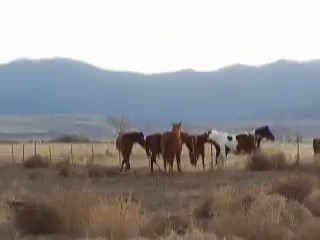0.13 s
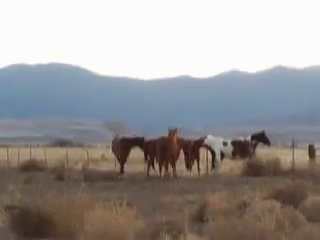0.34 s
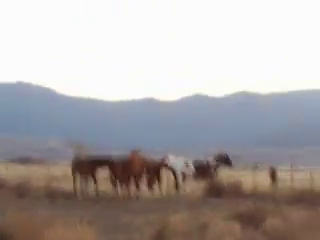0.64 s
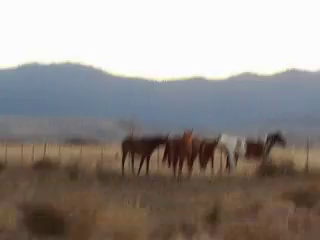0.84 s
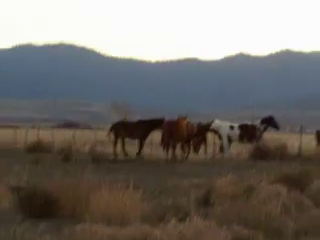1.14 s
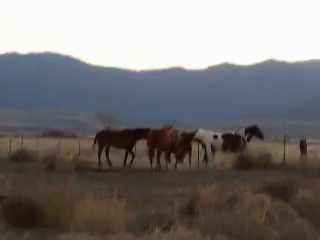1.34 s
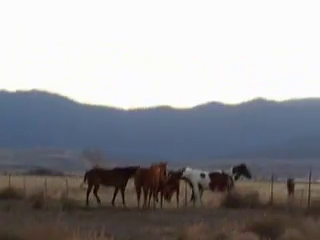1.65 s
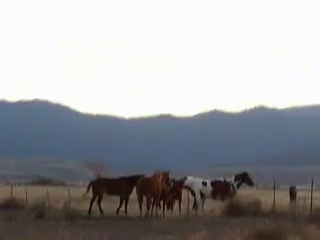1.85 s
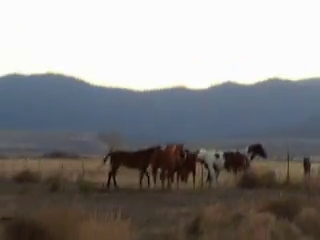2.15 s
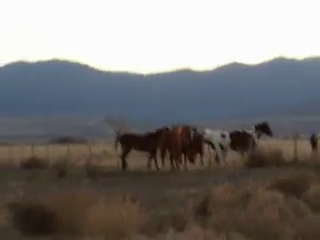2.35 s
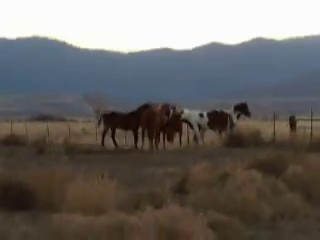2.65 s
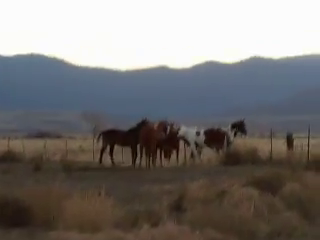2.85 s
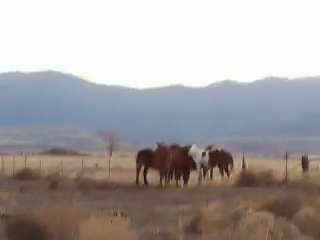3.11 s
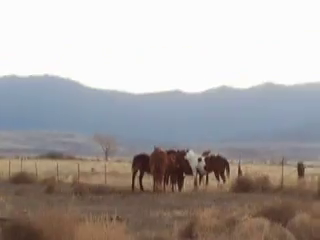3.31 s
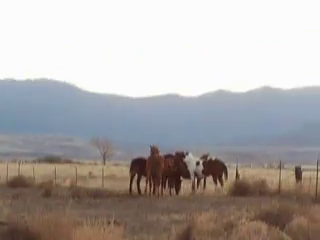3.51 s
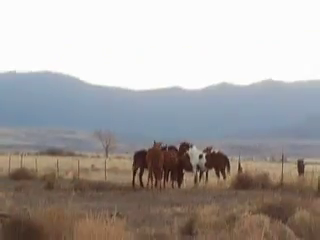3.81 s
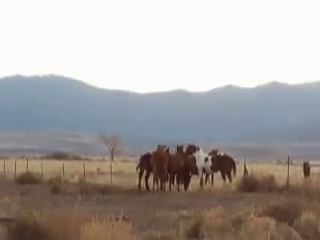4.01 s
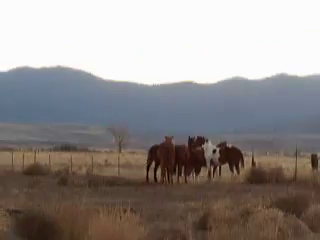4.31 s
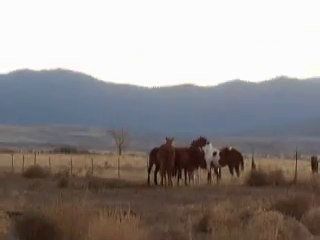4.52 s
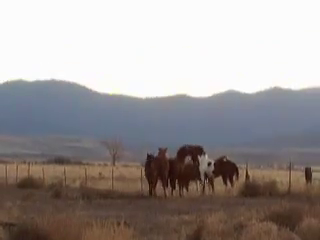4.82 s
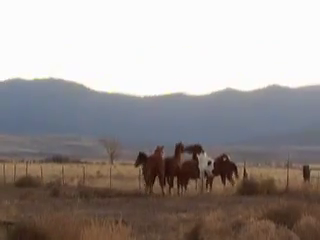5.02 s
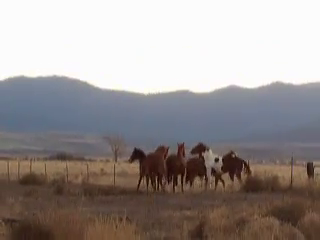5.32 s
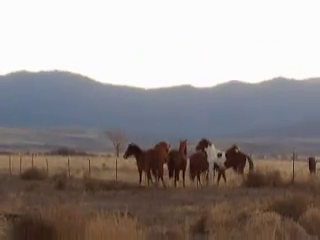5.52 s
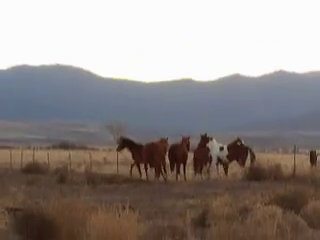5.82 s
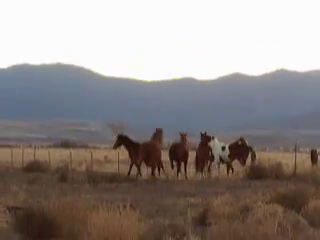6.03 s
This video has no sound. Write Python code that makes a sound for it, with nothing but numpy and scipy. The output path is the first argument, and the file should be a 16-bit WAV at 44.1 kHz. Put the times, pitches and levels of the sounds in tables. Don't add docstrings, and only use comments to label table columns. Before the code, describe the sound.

A low wind rumble and thin steady hiss open the scene, with a tiny bump near 0.26 s. From 0.3 s, fingers on the camera's plastic case make very close, loud scrapes, squeaky rubs and resonant clicks, strongest around 0.5 s, with a hard knock at 0.77 s. Rubbing weakens from about 1.1 to 1.7 s, with scattered ticks. A second dense bout runs from 1.75 to 3.15 s: gritty slides, sharp taps near 2.06 s, a strong scrape around 2.27 s and crowded rattling near 3 s, along with a gust. Then it drops to quiet wind and hiss, barely brushed at 3.5 s. At 4.45-4.9 s a distant horse squeals once: a rising, rough whistle, buzzing and raspy midway, then a second thinner push falling away into a faint field tail. Small wind puffs follow, then faint rubbing from 5.3 to 5.75 s and soft dull bumps until about 6.1 s.

```python
import sys
import numpy as np
from scipy import signal
from scipy.fft import rfft, irfft, next_fast_len
from scipy.io import wavfile

SR = 44100
rng = np.random.default_rng(int(sys.argv[2]) if len(sys.argv) > 2 else 0)


def volts_from_decibels(level):
    exponent = np.asarray(level, float) / 20
    return 10 ** exponent


def dump_mix(stems):
    frames = np.atleast_2d(stems).T
    limited = np.clip(frames, -1, 1)
    pcm = np.round(limited * 32767).astype(np.int16)
    wavfile.write(sys.argv[1], SR, pcm)


N = 271607


def evened(x):
    return x / np.sqrt(np.mean(x ** 2) + 1e-20)


def read(points, hz):
    f, value = np.transpose(points)
    return np.interp(np.log(hz + 1), np.log(f + 1), value, left=-90, right=-90)


def curves(points, t):
    s, *columns = np.transpose(points)
    return [np.interp(t, s, column) for column in columns]


def phase(hz):
    return 2 * np.pi * np.cumsum(hz) / SR


def add(mix, s, sound):
    part = mix[round(s * SR):][:len(sound)]
    part += sound[:len(part)]


def colour(x, points):
    return irfft(rfft(x) * volts_from_decibels(read(points, np.fft.rfftfreq(len(x), 1 / SR))), len(x))


def slow(hz):
    size = next_fast_len(N)
    smoothing = 1 + (np.fft.rfftfreq(size, 1 / SR) / hz) ** 4
    return evened(irfft(rfft(rng.standard_normal(size)) / smoothing, size)[:N])


def resonate(x, hz, width):
    turn, r = np.exp(1j * phase(hz)), np.exp(-np.pi * width / SR)
    return 2 * (turn * signal.lfilter([1 - r], [1, -r], x / turn)).real


def reach(t, crest, rise, fall):
    return np.maximum(crest - t, 0) / rise, np.maximum(t - crest, 0) / fall


# [f/Hz, level/dB per Hz]
AIR_SPECTRUM = [(60, -29.5), (100, -11), (182, -5.5), (366, -11.5), (417, -6.5), (619, -4.5), (901, -7.5),
                (1390, -14.5), (1980, -15.5), (2800, -18.5), (4050, -15.5), (4980, -20), (8100, -23.5),
                (8500, -42.5), (9100, -58)]
# [f/Hz, level/dB per Hz]
WIND_SPECTRUM = [(15, -35.5), (25, -5.5), (32, -7), (48, -7), (64, -0.5), (76, -8.5), (91, -10), (130, -12),
                 (170, -45), (290, -120)]
# [crest t/s, rise t/s, fall t/s, level/dB]
GUSTS = [
    (.29, 0.17, .25, -54.5),
    (.95, 0.44, 0.36, -60),
    (1.45, 0.31, 0.26, -60),
    (2.05, 0.25, .07, -53),
    (2.75, 0.76, 0.19, -55.5),
    (3.07, 0.15, 0.045, -48),
    (4.3, 0.63, 0.34, -60),
    (4.85, 0.041, 0.061, -52),
    (5.33, 0.13, 0.072, -55),
    (6.0, 0.15, 0.37, -62),
]
# [f/Hz, level/dB rms]
WHINES = [(183.0, -66.5), (500.6, -77.5), (3752, -74), (7779, -104.5), (7838, -99), (7897, -97),
          (8102, -97.5), (8161, -95)]


def air():
    t = np.arange(N) / SR
    hiss = volts_from_decibels(-55 + 0.5 * slow(hz=14.0)) * evened(colour(rng.standard_normal(N), AIR_SPECTRUM))
    gusts = sum(volts_from_decibels(db - 5.4 * sum(reach(t, *times)) ** 1.4) ** 2 for *times, db in GUSTS)
    lumps = evened(colour(rng.standard_normal(N), WIND_SPECTRUM) * volts_from_decibels(2.1 * slow(hz=4)))
    breeze_db = -65
    wind = np.sqrt(volts_from_decibels(breeze_db) ** 2 + gusts) * lumps
    whine = sum(volts_from_decibels(db - 1.5 + 4.1 * slow(hz=7.6)) * np.sin(2 * np.pi * (hz * t + rng.random()))
                for hz, db in WHINES)
    return hiss + wind + whine


# [t/s, peak level/dB, f/Hz, t60 t/s]
THUMPS = [(0.039, -52.5, 176, 0.085), (0.261, -53, 64.6, 0.054), (.285, -48, 150, .04),
          (0.315, -47.5, 230, 0.046), (.338, -50, 90, .05), (.36, -49, 100, .05), (0.7695, -27, 230, 0.03),
          (0.961, -36, 245, 0.028), (2.003, -47, 50.7, 0.028), (2.058, -27.5, 377, 0.016),
          (2.872, -50, 195, 0.14), (3.058, -31, 110, 0.03), (3.06, -41, 64, .12), (5.305, -57, 62, .25),
          (5.161, -54, 184, 0.076), (5.721, -49, 119, 0.032), (5.85, -44.5, 136, 0.038),
          (5.893, -47.5, 123, 0.041), (5.964, -56, 85, 0.041), (6.08, -57, 179, 0.13),
          (6.105, -54, 120, .05)]


def thumps():
    out, t = np.zeros(N), np.arange(9000) / SR
    for s, db, hz, t60 in THUMPS:
        cycles = np.sin(2 * np.pi * hz * t * (1 - 0.5 * t))
        add(out, s, volts_from_decibels(db + 11.0 - 60 * t / t60) * cycles * np.minimum(t / 0.0016, 1))
    return out


# [f/Hz, level/dB per Hz]
CASE_SPECTRUM = [(76, -60.5), (130, -24.5), (481, -19.5), (639, -12), (749, -12), (1230, -15.5),
                 (1340, -12.5), (1780, -11), (1950, -5), (2240, 1.5), (2580, -10.5), (3550, -7.5),
                 (4880, -9.5), (6960, -21.5), (8910, -50.5), (11600, -81), (19600, -120)]
CASE_EDGES = 120, 1500, 2800, 4200


def case_rings(size=2048):
    hz = abs(np.fft.fftfreq(size, 1 / SR))
    step = [1 / (1 + (f / (hz + 1)) ** 16) for f in CASE_EDGES] + [0]
    rings = []
    for k in range(4):
        gain = volts_from_decibels(read(CASE_SPECTRUM, hz)) * np.sqrt(abs(step[k] - step[k + 1]))
        minimum_phase = np.exp(np.conj(signal.hilbert(np.log(gain + 1e-5))))
        rings.append(np.fft.ifft(minimum_phase).real[:size // 2])
    return np.array(rings) / np.linalg.norm(rings, axis=1)[:, None]


# [t/s, peak level/dB, low modes level/dB, upper mode level/dB, t60 t/s]
PAD_TAPS = [(0.3112, -7, -17.5, -4, 0.022), (0.5896, -24.5, -27, -15, 0.049), (0.7257, -26, 4, -15, 0.031),
            (0.7712, -12, 0, 3, 0.025), (0.9033, -28, 7.5, -26, 0.017), (0.9655, -26, 5, 3, 0.015),
            (1.9224, -21, 0, 2.5, 0.018), (1.9614, -23.5, -7.5, -3, 0.026), (1.9979, -33, 6.5, -23, 0.016),
            (2.0592, -20, 5, 6, 0.025), (2.07, -17, -1, -8, 0.021), (2.236, -15, -17, -3, 0.038),
            (2.4267, -15.5, -11, -4, 0.055), (2.5142, -25, -1, 11, 0.019), (2.836, -13.5, -5, 15, 0.011),
            (3.0828, -8.5, -27, -11, 0.018), (5.011, -35.5, -6, -30, 0.017), (5.907, -42.5, 4, -25, 0.035),
            (6.0018, -45.5, 5, -12, 0.023)]
# [t/s, peak level/dB, low modes level/dB, upper mode level/dB, t60 t/s]
NAIL_TICKS = [(0.2583, -58, 23.5, -9.5, 0.038), (0.6848, -27, 0, 5, 0.012), (0.6924, -24, 0.5, -10, 0.0095),
              (0.7665, -13, 0, -2, 0.042), (1.1059, -30.5, 2.5, -15, 0.018),
              (1.0161, -21, -31, 2.5, 0.0036), (1.2226, -40.5, -15, 13, 0.016),
              (1.5564, -22.5, -1, 1, 0.023), (1.7579, -42, 0, -1, 0.017), (1.8878, -17, -1.5, 1, 0.023),
              (2.97, -20, -18, 12, 0.02)]
# [t/s, peak level/dB, low modes level/dB, upper mode level/dB, t60 t/s]
EDGE_FLICKS = [
    (1.075, -25, -18, 7.5, 0.015),
    (2.0654, -20, 4.5, 6, 0.03),
    (4.4464, -50, -19, -3, 0.0076),
    (5.7409, -51.5, -6, 23.5, 0.021),
]


def taps():
    out, t, rings = np.zeros(N), np.arange(3000) / SR, case_rings()
    # table, hiss of a tap near -28 dB, bare click that skips the case
    kinds = (PAD_TAPS, -20, 0), (NAIL_TICKS, 1, volts_from_decibels(-44)), (EDGE_FLICKS, 11, volts_from_decibels(-38))
    for table, tip_db, snap in kinds:
        for s, db, low_db, upper_db, t60 in table:
            decay_s = max(t60, .003)
            tick = rng.standard_normal(3000) * volts_from_decibels(-60 * t / decay_s)
            tick[0] = 5.9
            hiss_db = tip_db - 0.39 * (db + 28) + 2.6 * np.log(0.015 / decay_s)
            for share_db, ring in zip((low_db, 0, upper_db, hiss_db), rings):
                part = signal.oaconvolve(tick, ring)
                add(out, s - .0005, volts_from_decibels(db + share_db - 3.0) * part / abs(part).max())
            add(out, s - .0005, snap * volts_from_decibels(db + hiss_db) * np.diff(tick))
    return out


# [crest t/s, rise t/s, fall t/s, main mode pressure
# level/dB, speed hiss level/dB]
FINGER_STROKES = [(0.302, 0.019, 0.068, -50.5, 2), (.385, 0.058, 0.14, -33.5, 4),
                  (.478, 0.034, 0.029, -25, -2.5), (0.512, 0.042, 0.05, -19.5, -6.5),
                  (0.544, .03, 0.031, -24, -13), (.598, 0.035, 0.03, -39, -5),
                  (0.646, 0.039, 0.052, -36, -4.5), (0.687, 0.014, 0.017, -34, -18),
                  (.74, 0.059, 0.12, -39.5, 0.5), (0.785, 0.035, 0.033, -33, -6.5),
                  (.835, 0.028, 0.042, -38, -2), (.875, 0.036, 0.05, -40, 0), (0.911, 0.02, 0.1, -35, -3),
                  (1.033, 0.039, 0.055, -43, -3.5), (1.15, 0.056, 0.057, -45, -2),
                  (1.228, 0.0074, 0.047, -49.5, 1.5), (1.27, 0.02, 0.11, -54.5, 2),
                  (1.382, 0.041, 0.061, -47.5, -1), (1.45, .01, 0.011, -54, 5),
                  (1.501, 0.12, 0.053, -54.5, 0), (1.595, 0.029, 0.022, -45.5, -6),
                  (1.679, 0.033, 0.024, -49, -4),
                  (1.826, 0.073, 0.055, -30.5, 0), (1.862, 0.037, 0.01, -37, -9),
                   (1.882, 0.0087, 0.022, -39.5, -10), (1.921, 0.035, 0.021, -33, -5),
                   (1.955, .03, 0.054, -44, -5), (2.014, 0.018, 0.057, -38.5, -2.5),
                   (2.108, 0.07, 0.15, -30.5, 0.5), (2.272, 0.058, 0.068, -21.5, -3),
                   (2.392, 0.13, 0.079, -32, -2), (2.434, 0.024, 0.008, -33, 0),
                   (2.475, 0.036, 0.088, -45, -2), (2.53, 0.026, 0.044, -27.5, -11),
                   (2.58, 0.013, 0.045, -46, -5), (2.608, .025, .03, -42, -5),
                   (2.646, 0.04, 0.23, -29.5, -7), (2.74, 0.15, 0.077, -34, -0.5),
                   (2.817, 0.034, 0.073, -28.5, -1.5), (2.864, 0.017, 0.093, -26.5, -8),
                   (2.976, 0.017, 0.035, -26, -4.5), (3.015, 0.025, 0.044, -26.5, -5.5),
                   (3.052, 0.053, 0.041, -23.5, -5.5), (3.088, 0.02, 0.047, -28.5, -4.5),
                   (3.132, 0.042, .005, -37, -3), (3.532, 0.12, 0.083, -62, 2),
                   (5.33, 0.032, 0.083, -61.5, -9), (5.4, 0.04, 0.31, -58.5, 0),
                   (5.515, 0.03, 0.17, -54, 2), (5.64, 0.087, 0.11, -52, 1), (5.735, 0.017, 0.01, -57, 5)]
# [t/s, f/Hz, loosening of the grip level/dB, hollow level/dB]
FINGER_HOLLOW = [(.33, 3550, 2, -4.5), (.66, 3600, -1.5, -4.5), (.95, 3680, 5.5, -8), (1.1, 4850, 2.5, 2),
                 (1.3, 4660, -0.5, -3), (1.4, 3930, -6.5, -0.5), (1.76, 4370, -9, 3.5),
                 (1.86, 4640, -3.5, 4), (1.9, 3750, 2.5, -4), (2.15, 3290, -1, -10), (2.5, 3660, -1.5, -2),
                 (2.62, 3600, -2.5, 5.5), (2.76, 3600, -1.2, -16), (2.82, 5000, -1.3, -6),
                 (2.95, 4600, -2, -18), (2.98, 3400, 1, 5.5), (3.13, 3370, 0, -9), (5.3, 4000, -7, 5)]
# [t/s, f/Hz, ring share (below 0 damped)]
SQUEEZE = [(.33, 2290, -.2), (.5, 2180, 0.059), (.63, 2190, -0.36), (1.0, 2230, -0.22), (1.68, 2220, -0.17),
           (1.82, 2400, 0.71), (1.97, 2180, 0.11), (2.2, 2250, -0.18), (2.28, 2050, 0.14),
           (2.45, 2260, -0.68), (2.62, 2090, 0.35), (2.9, 2030, 0.83), (3.04, 2280, -0.26),
           (3.13, 2080, 0.35), (5.3, 2200, -0.41)]


def stroke_power():
    t, power = np.arange(N) / SR, np.zeros((4, N))
    _, loose_db, _ = curves(FINGER_HOLLOW, t)
    for crest, rise, fall, db, speed_db in FINGER_STROKES:
        near = slice(round((crest - rise - .03) * SR), round((crest + fall + .03) * SR))
        before, after = reach(t[near], crest, rise, fall)
        swell_db = -18 * (before ** 1.67 + after ** 1.68)
        lift_db = -4000 * (np.maximum(before - 1, 0) * rise + np.maximum(after - 1, 0) * fall)
        grip_db = min(-0.56 * (db + 44.5), -2) + loose_db[near]
        low_db = grip_db + 0.7 * swell_db
        upper_db = 1.5 + 0.23 * speed_db + 0.93 * swell_db
        hiss_db = speed_db + 0.96 * swell_db
        power[:, near] += volts_from_decibels(db + lift_db + np.array([low_db, swell_db, upper_db, hiss_db])) ** 2
    return power


def strokes():
    t, power = np.arange(N) / SR, stroke_power()
    hollow_hz, _, depth_db = curves(FINGER_HOLLOW, t)
    size = rng.exponential(1, N)
    light = 1 / (1 + power[1] / volts_from_decibels(-51) ** 2)
    slip_db = 1.8 * np.minimum(size, 5) + 7 * light * (size > 5.34)
    slips = volts_from_decibels(slip_db) * rng.standard_normal(N) * (rng.random(N) < 14000 / SR)
    slips = evened(slips * volts_from_decibels(1.0 * slow(hz=120)))
    bands = []
    for level, ring in zip(power, case_rings()):
        patch = evened(volts_from_decibels(0.33 * slow(hz=49)))
        bands.append(signal.oaconvolve(slips * patch * np.sqrt(level), ring)[:N])
    low, main, upper, hiss = bands
    hollow = resonate(upper + hiss, hollow_hz, width=400)
    mode_hz, ring = curves(SQUEEZE, t)
    main = main + np.clip(ring, -1, 2) * resonate(main, mode_hz, width=140)
    free = sum(resonate(low, hz + 0 * t, width=44) for hz in (613, 1370))
    low = low + 2.54 * np.maximum(ring, 0) * free
    return low + main + volts_from_decibels(-3.0) * (upper + hiss) + volts_from_decibels(depth_db) * hollow


# [t/s, peak level/dB, f/Hz, t60
# t/s]
SKIN_CATCHES = [(.348, -28, 2500, .02), (.361, -32, 4150, .015), (.379, -25, 3640, .015),
                (.3115, -28, 1000, .02), (.3115, -30, 630, .04), (.5893, -26, 2220, .02),
                (.470, -22, 2340, .02), (.479, -14, 3700, .02), (.484, -12.5, 3600, .015),
                (.498, -9, 2140, .02), (.503, -10, 2100, 0.018), (.514, -11, 3360, .012),
                (.521, -11, 2190, .03), (0.546, -10, 2870, 0.012), (0.681, -26, 1600, .02),
                (.7255, -26, 1430, 0.027), (.7255, -26, 855, 0.024), (.7672, -12, 3600, .015),
                (.7672, -20, 5160, 0.014), (0.77, -14, 1440, .04), (0.7714, -14.5, 998, 0.031),
                (0.7708, -14.5, 1760, 0.03), (0.774, -16, 1610, 0.026), (.782, -27, 1306, .03),
                (0.791, -24, 3650, .015), (.834, -26, 1400, .015), (0.868, -30.5, 982, .02),
                (.9655, -20, 553, 0.019), (.9655, -22, 870, 0.024), (1.104, -29, 710, 0.021),
                (1.151, -33, 746, 0.024), (1.266, -37, 700, .02), (1.5566, -27, 680, 0.024),
                (1.5566, -20, 3950, .01), (.6855, -27, 3900, .012), (.909, -25, 1900, .03),
                (.927, -26, 3900, .015), (.915, -27, 900, .04),
                (1.736, -41, 3320, .015), (1.757, -34, 800, .03), (1.763, -30, 4650, 0.014),
                  (1.785, -31, 2340, .02), (1.806, -21, 4530, .02), (1.814, -16.5, 2360, 0.044),
                  (1.835, -17, 2380, 0.028), (1.867, -21, 3470, .015), (1.905, -21, 3860, .02),
                  (1.912, -21, 3600, .012), (1.942, -27, 3860, .01), (1.998, -26.5, 560, 0.018),
                  (2.014, -25, 2390, .015), (2.059, -24, 6400, .01), (2.0595, -14, 740, 0.028),
                  (2.069, -18.5, 734, 0.032), (2.066, -18, 4000, 0.031), (2.257, -20, 2190, 0.017),
                  (2.279, -13.5, 1920, .025), (2.305, -18, 2280, 0.013), (2.4275, -17, 2240, .015),
                  (2.4275, -22, 1000, .015), (2.8358, -14, 4900, .007), (2.532, -13, 3800, .015),
                  (2.617, -24, 3400, 0.018), (2.641, -15, 2200, 0.022), (2.648, -14.5, 2310, 0.036),
                  (2.668, -20, 2145, .03), (2.687, -17, 2070, .025), (2.704, -20, 2280, .03),
                  (2.760, -20, 2080, .025), (2.796, -16, 2030, .02), (2.853, -26, 5030, .01),
                  (2.8655, -14, 2150, 0.027), (2.885, -19, 2100, 0.032), (2.9695, -10, 3210, 0.017),
                  (2.9745, -10.5, 3540, 0.016), (2.981, -16, 3520, .015), (2.986, -15, 2260, 0.01),
                  (3.013, -18.5, 2320, .04), (3.015, -16, 3300, .03), (3.038, -15, 3140, 0.034),
                  (3.050, -16.5, 3670, .03), (3.059, -15.5, 3120, 0.029), (3.062, -20, 2330, 0.032),
                  (3.096, -16, 2190, 0.031), (3.104, -24, 3720, 0.018)]


def catches():
    out, t = np.zeros(N), np.arange(3000) / SR
    rise = 1 - np.exp(-t / 0.00055)
    for s, db, hz, t60 in SKIN_CATCHES:
        add(out, s, volts_from_decibels(db - 60 * t / max(t60, .004)) * np.sin(2 * np.pi * hz * t) * rise)
    return out


# [t/s, f/Hz, effort level/dB, 2nd partial over 1st level/dB]
SQUEAL = [
    [(4.43, 1192, -47, -23), (4.46, 1464, -42, -57), (4.49, 1768, -33, 19.5), (4.55, 1717, -44, -6),
     (4.57, 1575, -40.5, -10), (4.588, 1767, -33, 5), (4.608, 1707, -32, 8), (4.638, 1640, -34.5, -1),
     (4.69, 1653, -49.5, -15)],
    [(4.706, 1710, -40.5, 17), (4.734, 1822, -35, 52), (4.765, 1651, -46, -12), (4.84, 1598, -46.5, -2),
     (4.855, 1437, -51, -23), (4.88, 1046, -58, -12), (4.9, 1000, -57, -5)],
]


def whistle(t, low, flutter):
    hz, effort_db, lean_db = curves(np.concatenate(SQUEAL), t)
    first_db = effort_db - 10 * np.log10(1 + volts_from_decibels(lean_db) ** 2)
    third_db = -56 - 13 * abs(3 * hz - 4200) / 1000
    fourth_db = -58.5 - 400 * abs(t - 4.5)
    turn = phase(hz * (1 + 0.025 * flutter * slow(hz=119)[:len(t)]))
    turn = turn + .9 * np.maximum(flutter - .15, 0) * np.sin(low)
    beat = evened(1 + flutter * (0.39 * np.cos(low) + 0.85 * slow(hz=110)[:len(t)]))
    partials_db = first_db, first_db + lean_db, third_db, fourth_db
    return np.sqrt(2) * beat * sum(volts_from_decibels(db) * np.cos(k * turn) for k, db in enumerate(partials_db, 1))


# [f/Hz, level/dB]
RASP_SPECTRUM = [(600, -11), (1200, -6), (2200, -6.5), (2900, -20), (3600, 10), (5000, -10), (7000, -24.5)]


def rasp(t, low):
    rush_db = np.interp(t, [4.45, 4.542, 4.672, 4.697], [-64, -38.5, -41.5, -56])
    rush_db = rush_db - 55 * np.maximum(t - 4.672, 0)
    breath = rng.standard_normal(len(t)) * (1 + 0.31 * np.cos(low))
    rough = colour(breath, RASP_SPECTRUM) * volts_from_decibels(1.1 * slow(hz=200)[:len(t)])
    return volts_from_decibels(rush_db + 1.5) * evened(rough)


# [t/s, f/Hz, level/dB, flutter 0-1]
SLOW_FOLDS = [
    (4.5, 470, -70, .3),
    (4.56, 440, -58, .6),
    (4.585, 395, -53, .9),
    (4.605, 362, -44, .6),
    (4.63, 342, -42, .3),
    (4.655, 328, -44, .3),
    (4.68, 320, -62, .25),
    (4.9, 320, -90, .2),
]
# [f/Hz, level/dB]
THROAT = [(250, -6), (400, 0), (1000, 0), (1400, -4), (2300, 0), (2900, -12), (3600, 4), (5000, -7),
          (7000, -20)]


def slow_folds(t):
    hz, db, flutter = curves(SLOW_FOLDS, t)
    low = phase(hz * (1 + 0.0067 * slow(hz=58.8)[:len(t)]))
    pulses = sum(np.cos(k * low + .7 * k * k) / k ** .3 for k in range(1, 14))
    buzz = volts_from_decibels(db + 2.6 + 2.5 * slow(hz=50)[:len(t)]) * evened(colour(pulses, THROAT))
    return low, flutter, buzz


# [t/s, f/Hz, level/dB]
SIDE_WHISTLE = [
    (4.68, 3800, -79),
    (4.698, 3980, -60),
    (4.746, 4100, -53),
    (4.77, 4000, -68),
    (4.797, 4100, -57),
    (4.81, 4050, -70),
    (4.827, 4000, -49),
    (4.845, 3950, -77),
]


def side_whistle(t):
    s, hz, db = np.transpose(SIDE_WHISTLE)
    level_db = np.interp(t, s, db, -90, -90) + 5.0 + 4.3 * slow(hz=40)[:len(t)]
    return volts_from_decibels(level_db) * np.cos(phase(np.interp(t, s, hz)))


def horse():
    out, t = np.zeros(N), np.arange(4.43, 4.9, 1 / SR)
    low, flutter, buzz = slow_folds(t)
    call = whistle(t, low, flutter) + side_whistle(t) + buzz + rasp(t, low)
    add(out, t[0], call * signal.windows.tukey(len(t), .04))
    return out


def field(x):
    t = np.arange(SR) / SR
    tail = rng.standard_normal(SR) * volts_from_decibels(-60 * t / 1.55) * np.minimum(t / 0.019, 1)
    return volts_from_decibels(-17.5) * signal.fftconvolve(x, tail / np.linalg.norm(tail))[:N]


def scene():
    call = horse()
    return (air() + thumps() + taps() + strokes() + catches() + call + field(call))[None]


def band_limit(x):
    return signal.sosfilt(signal.butter(12, 9060, fs=SR, output="sos"), x)


def record(dry):
    rounded = dry / (1 + (dry / 1.1) ** 4) ** .25
    lowpass = signal.firwin(1023, 8960, window=("kaiser", 10), fs=SR)
    band = signal.oaconvolve(rounded, lowpass[None], "same")
    return band_limit(band)


dry = scene()
out = record(dry)
dump_mix(out)
```